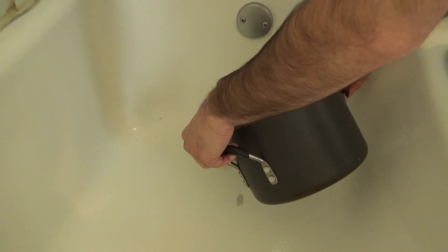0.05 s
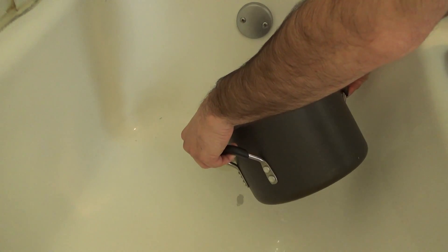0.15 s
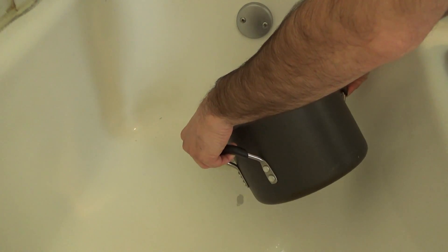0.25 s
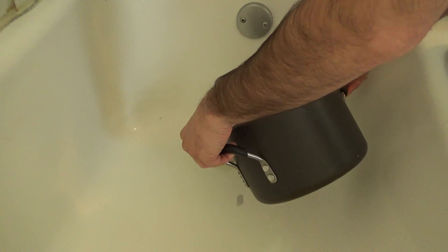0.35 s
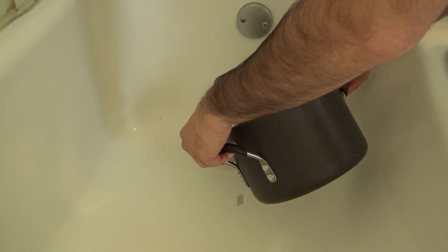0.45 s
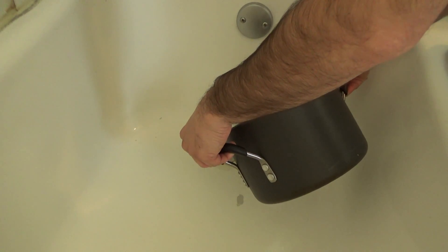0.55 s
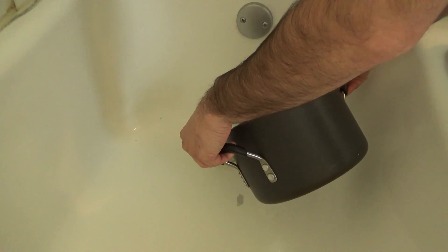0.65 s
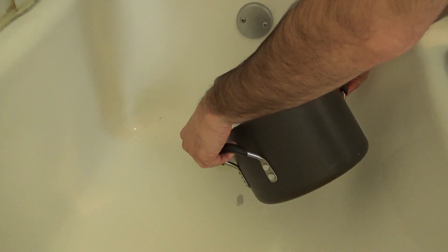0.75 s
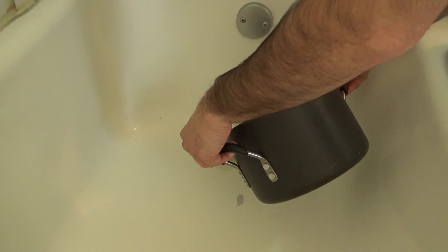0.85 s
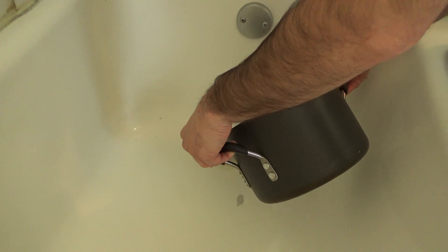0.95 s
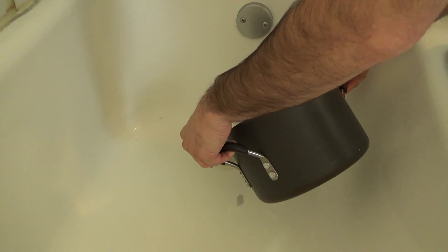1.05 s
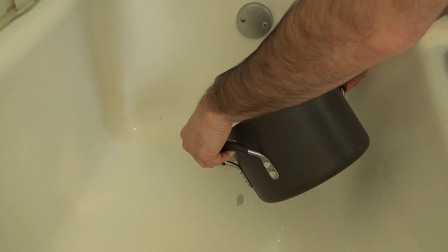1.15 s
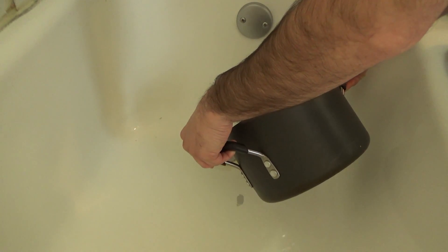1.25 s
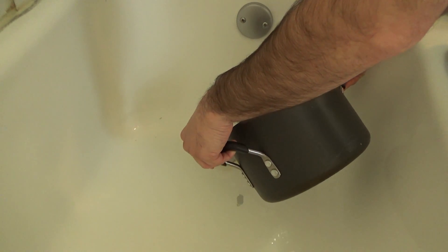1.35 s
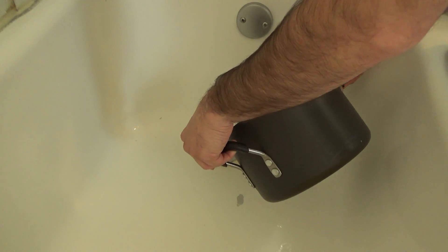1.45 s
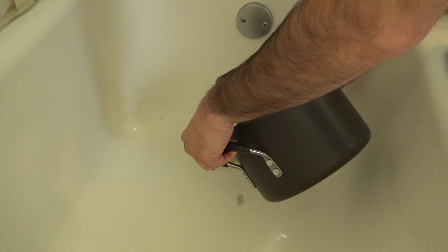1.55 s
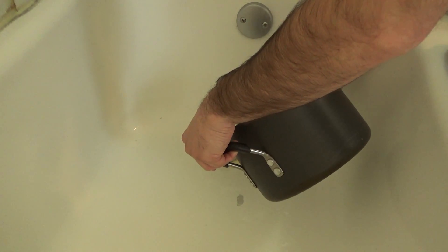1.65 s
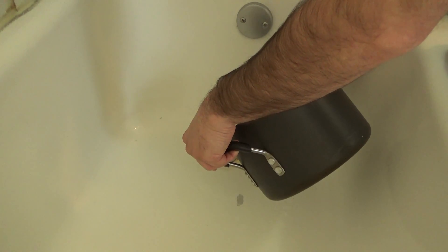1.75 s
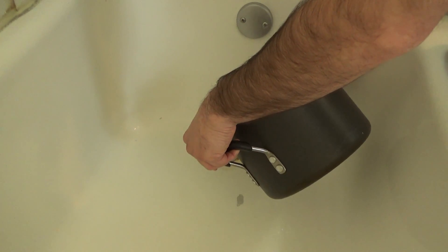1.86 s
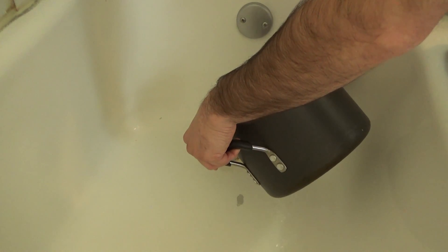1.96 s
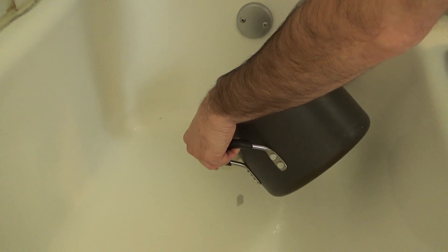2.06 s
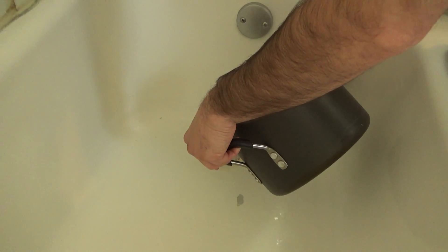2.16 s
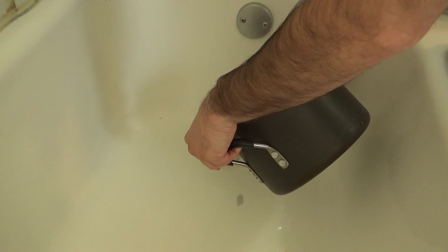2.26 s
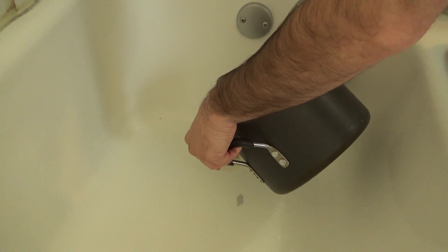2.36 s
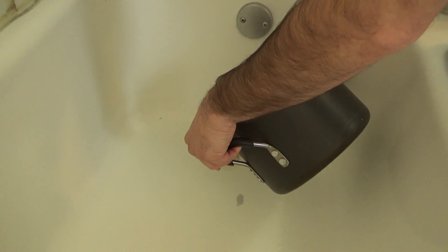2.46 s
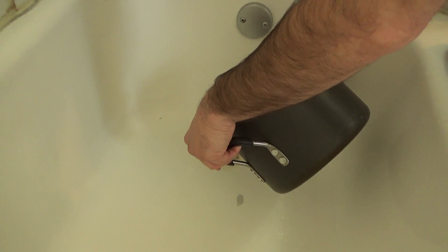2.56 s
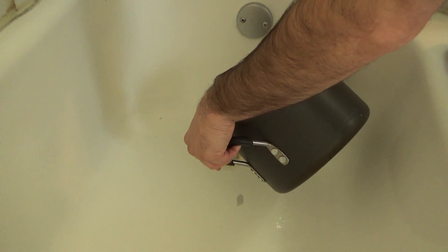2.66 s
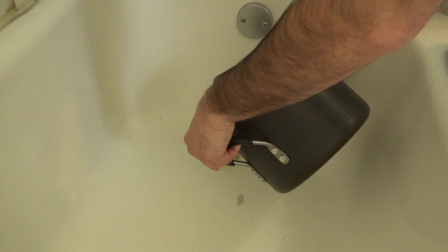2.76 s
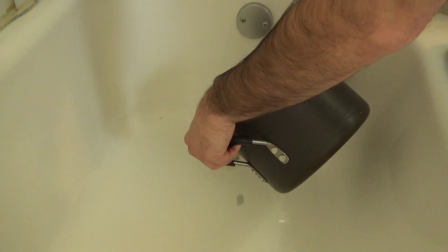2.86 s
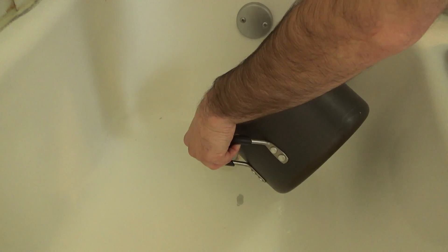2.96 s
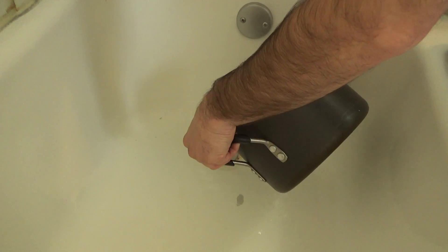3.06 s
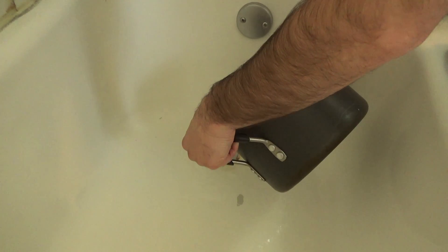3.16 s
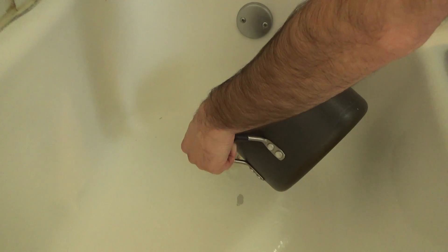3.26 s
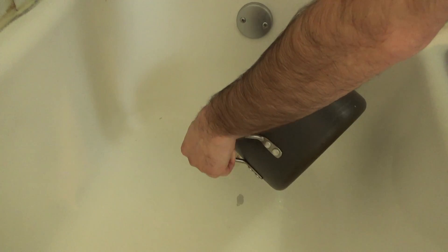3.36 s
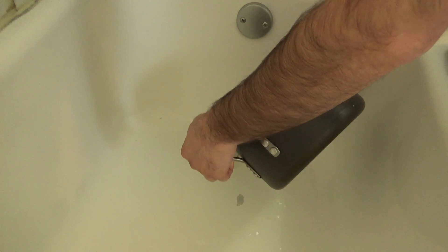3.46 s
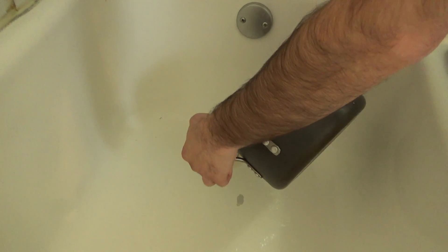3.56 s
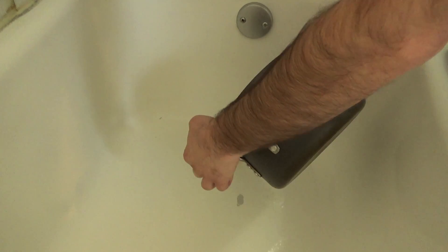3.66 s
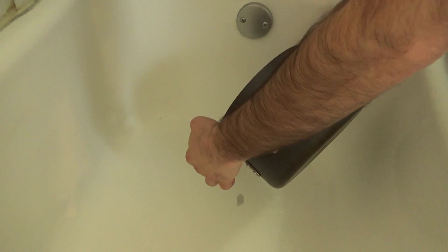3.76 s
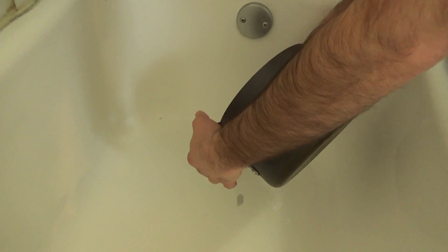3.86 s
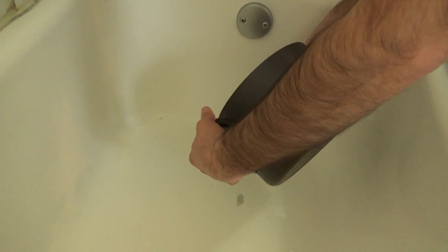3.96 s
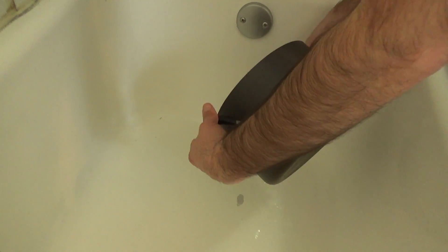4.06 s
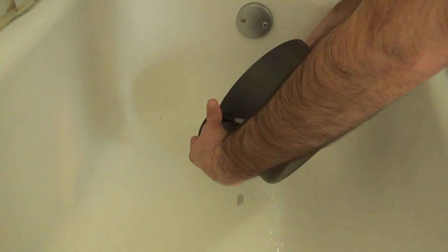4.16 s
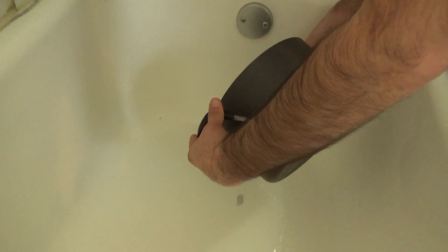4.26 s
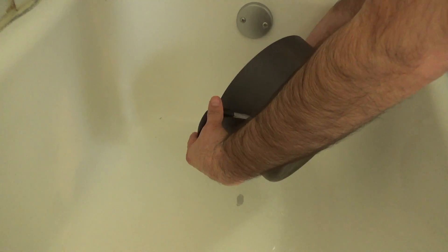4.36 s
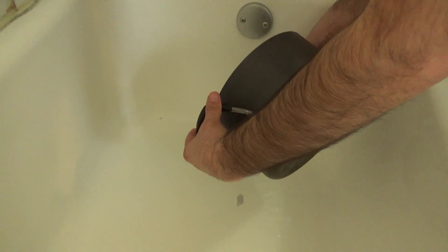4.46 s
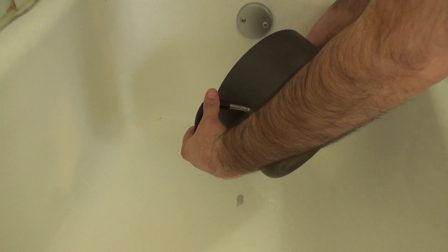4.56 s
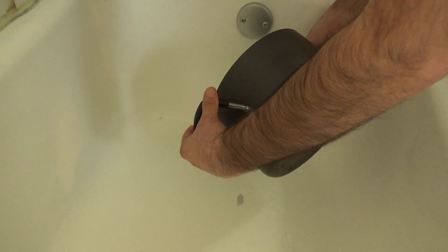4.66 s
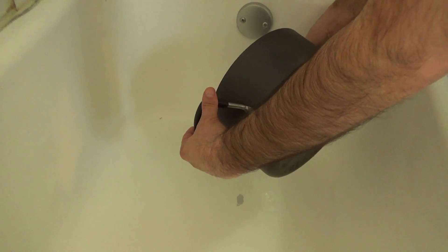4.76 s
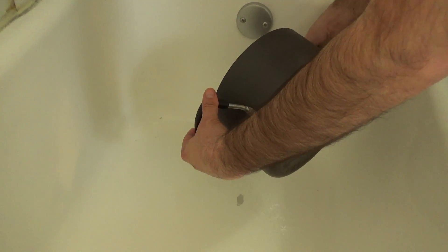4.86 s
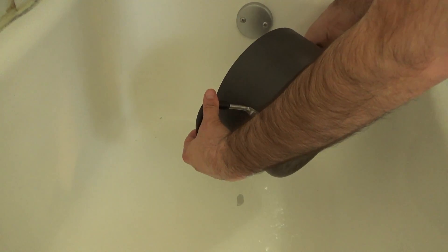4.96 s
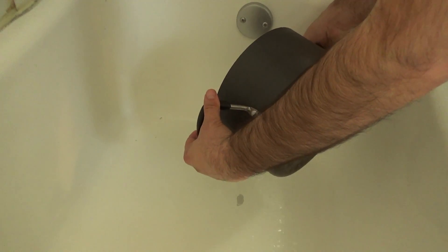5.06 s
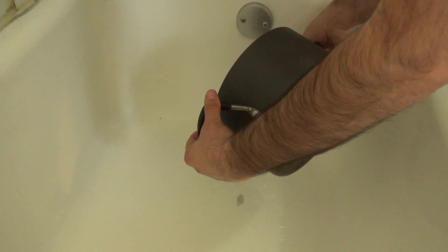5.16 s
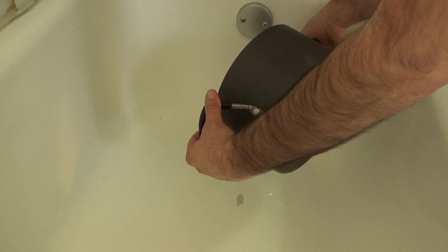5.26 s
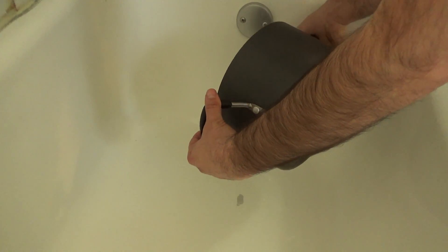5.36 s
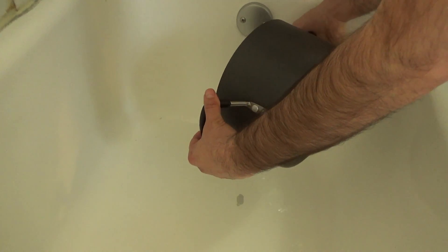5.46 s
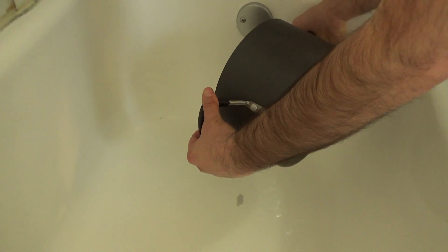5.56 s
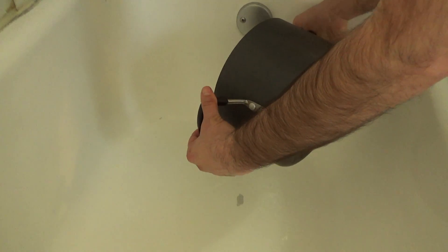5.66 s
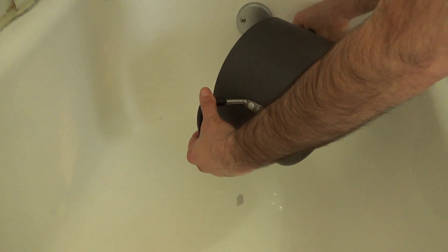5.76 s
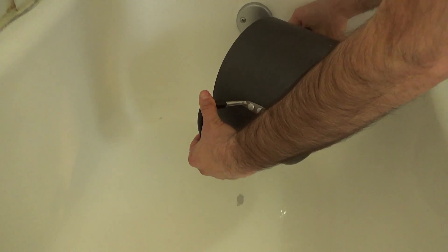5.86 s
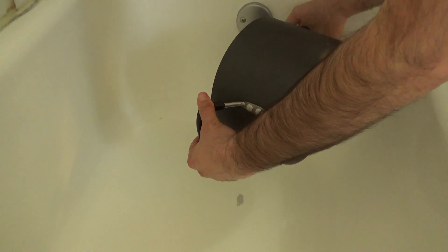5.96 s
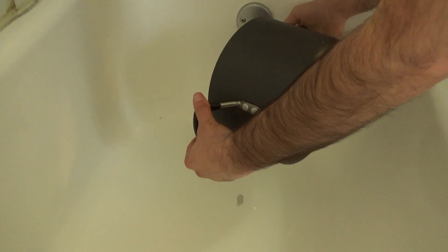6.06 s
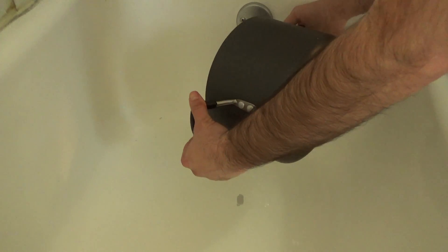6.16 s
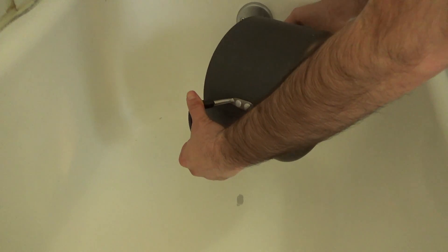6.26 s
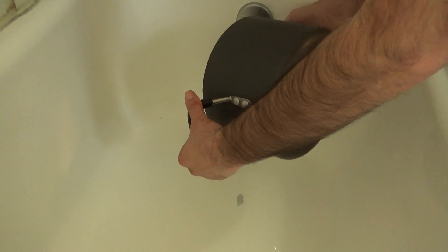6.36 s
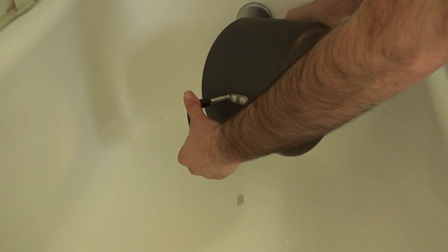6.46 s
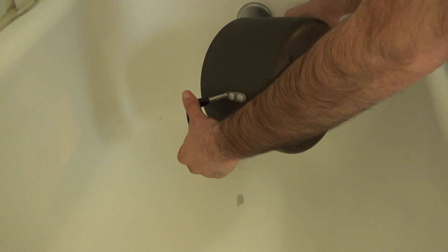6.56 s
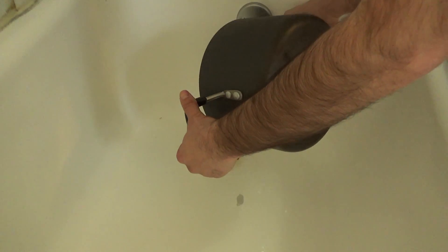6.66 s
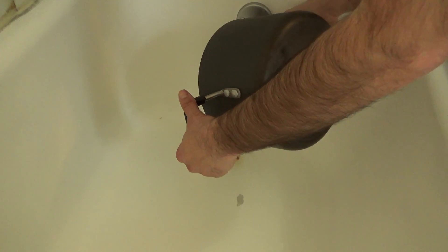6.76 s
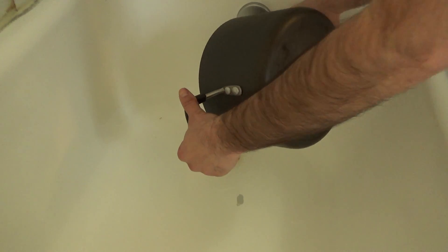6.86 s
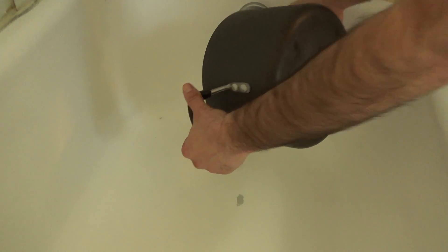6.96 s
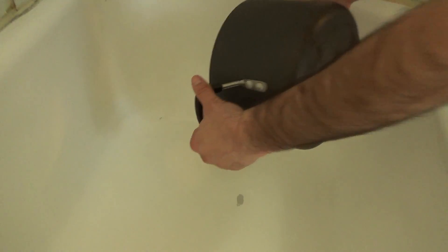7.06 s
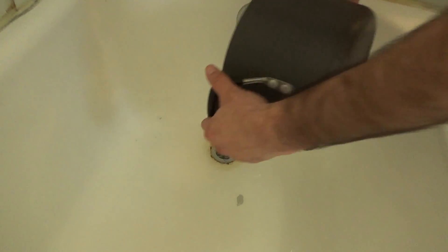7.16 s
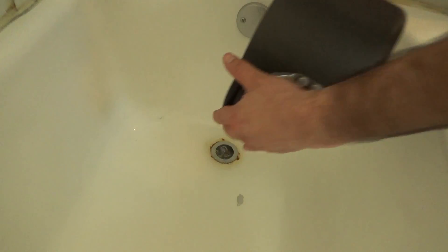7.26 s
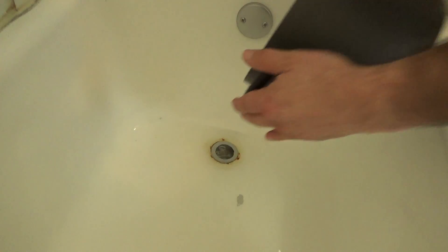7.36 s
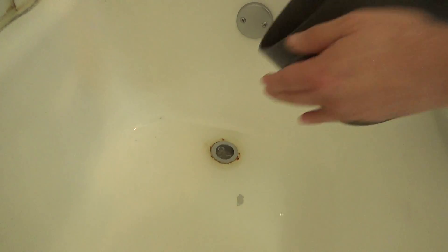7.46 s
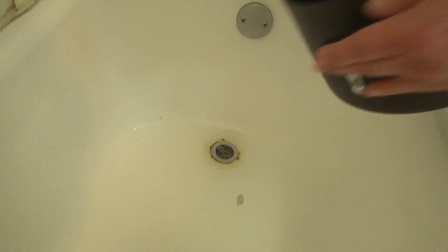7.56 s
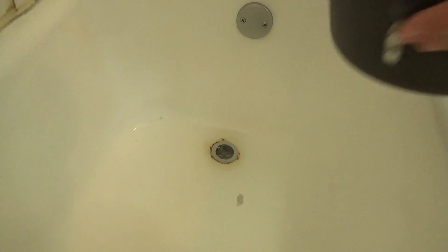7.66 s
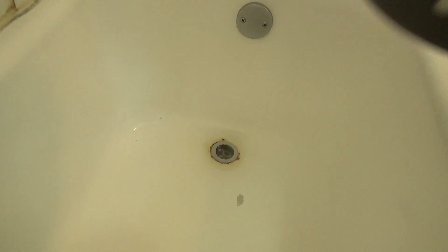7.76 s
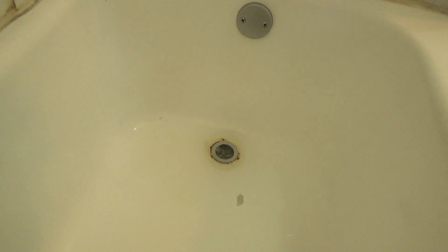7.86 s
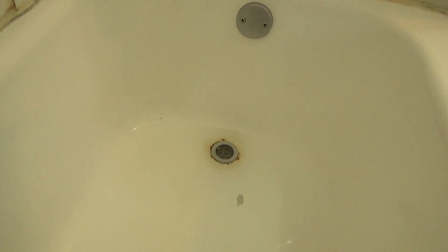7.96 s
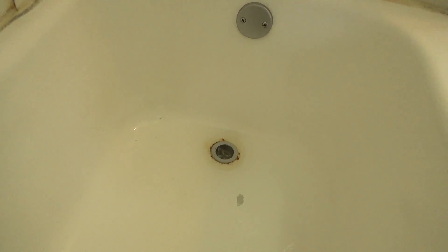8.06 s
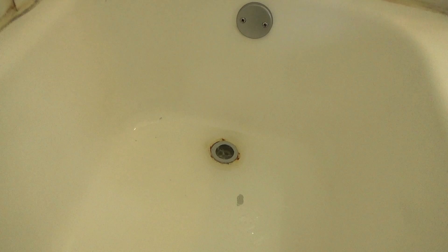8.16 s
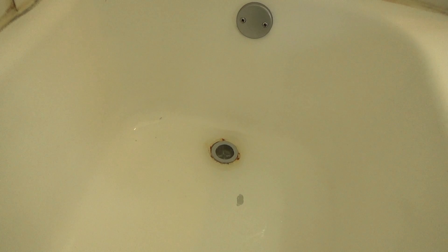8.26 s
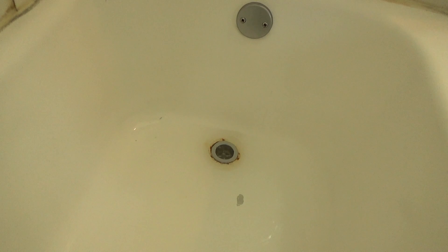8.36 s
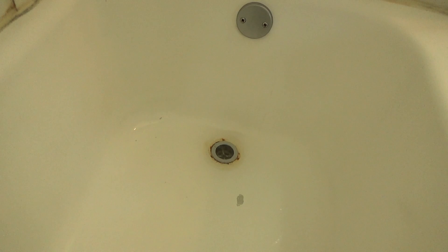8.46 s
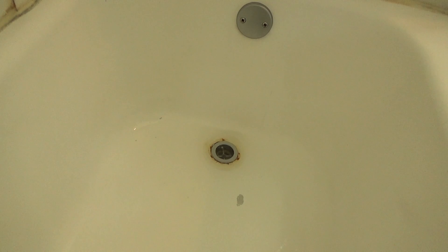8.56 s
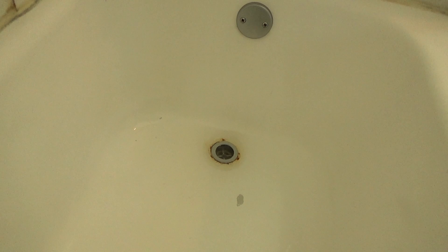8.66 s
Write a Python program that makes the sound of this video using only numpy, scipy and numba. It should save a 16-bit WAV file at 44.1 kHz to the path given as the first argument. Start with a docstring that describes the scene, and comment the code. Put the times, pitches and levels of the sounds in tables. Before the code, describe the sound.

A stereo microphone above the bathtub catches an already running pour: dense tiny bubbles, sharp wet slaps, fine spray and muffled tub resonance, strongest in the first few seconds. It thins to separate plips and gulps, then bright drips around the pot's removal. Soft dull bumps follow, with a smooth hiss swelling and fading slightly to the right, in a short tiled echo.

```python
"""Hot water into a bathtub

Hot water is tipped from a pot onto the floor of an enamelled tub in a small tiled room. The stream is thousands
of tiny sine bubbles; its slaps add ticks, trapped air, crackle and noise spray, and ring the tub's decaying modes.
Single bubbles sound from low gulps to high blips, and the last drips tick. Then a soft hiss of filtered noise
swells among a few dull modal knocks, over the quiet of the room: shaped noise with a low rumble."""
import sys
import numpy as np
from scipy import signal
from scipy.fft import rfft, irfft
from scipy.io import wavfile
from scipy.ndimage import uniform_filter1d
from numba import njit

SR = 44100
rng = np.random.default_rng(int(sys.argv[2]) if len(sys.argv) > 2 else 0)


def to_wav(sig):
    """Store sig (one row per channel, or 1-D mono) as 16-bit WAV at the path in sys.argv[1].

    Samples outside -1..1 are clipped; the rate is SR.
    """
    pcm = np.clip(np.atleast_2d(sig), -1, 1) * 32767
    pcm = np.round(pcm).astype(np.int16)
    wavfile.write(sys.argv[1], SR, pcm.T)  # frames by channels


N = 384552
TIME = np.arange(N) / SR

# All source levels are relative: layer gains, the room and the microphone come after them.
# Tone of the quiet room. Each row: frequency in Hz, relative density in dB.
QUIET_TONE = [(12, -44), (20, -15), (79, -1), (216, -6), (270, 3.5), (660, 0), (2990, -4.5), (3250, -3.5),
              (6540, -10), (12100, -15), (16000, -56)]
# Left-right likeness of the quiet room. Each row: frequency in Hz, correlation from 0 to 1.
QUIET_LIKENESS = [(25, .7), (60, 0.97), (500, 0.8), (2000, 0.073), (8000, 0.73)]
QUIET_DB = -63.5  # rms of the quiet without its rumble
# The low rumble. Each row: time in seconds, level in dB.
RUMBLE = [(0, -87), (4.7, -84), (5.0, -66), (5.3, -90), (6.4, -63), (7.0, -101), (7.9, -67), (8.25, -64),
          (8.72, -88)]

# The stream between slaps. Each row: time in seconds, wash level in dB, level of the drumming on the tub in dB.
FLOW = [(0.0, -44, -36.5), (0.23, -47, -49), (0.62, -40, -41.5), (0.88, -43, -47), (1.15, -41, -35.5),
        (1.36, -40, -52), (1.54, -42, -57), (2.13, -46, -47), (2.57, -44.5, -54), (2.75, -46.5, -67),
        (2.94, -46, -51), (3.14, -45.5, -74), (3.43, -47.5, -51.5), (3.84, -51.5, -61), (4.11, -48.5, -45),
        (4.23, -48.5, -45.5), (4.87, -51.5, -47.5), (5.24, -51.5, -50), (6.28, -50.5, -57),
        (6.4, -54.5, -48.5), (6.55, -63, -62.5), (7.0, -75.5, -77)]
# Moments when the stream thins. Each row: centre in seconds, width (standard deviation) in seconds.
LULLS = [(1.2, 0.1), (3.28, 0.034), (3.87, 0.0076), (4.36, 0.024), (5.12, 0.02)]
LULL_DB = -8  # wash and drumming at the centre of a lull
FULL_FLOW_DB = -42  # wash level taken as full flow
SPRAY_SHARE_DB = -4  # spray against the wash, at full flow
SPRAY_FOLLOWS = 0.64  # dB that the spray moves per dB of wash

# Modes of the tub shell. Each row: frequency in Hz, drive level in dB, decay by 60 dB in seconds.
TUB_MODES = [(127.7, 4.5, 0.2), (185, -2.5, 0.3), (248.2, -5, 0.17), (286.7, -4, 0.31), (343.2, -1, 0.22),
             (401.7, -1.5, 0.08), (510.6, -3.5, 0.095), (658, 8.5, 0.043), (730, 4.5, 0.076),
             (780.4, 0, 0.079), (850, 7.5, 0.039), (977, 2.5, 0.043), (1360, 6.5, 0.034), (1510, 3, 0.063),
             (1814, 4, 0.06)]
# The stream wanders over the tub floor, so each mode swells and fades (scale in dB, steps per s).
WANDER_DB, WANDER_RATE = 3.5, 20
# Sloshing water loads the shell and bends its pitch (scale of the time slip in s, steps per s).
LOAD_S, LOAD_RATE = 0.0008, 12

# Slaps placed one by one, loud and faint.
# Each row: time in seconds, level in dB, pitch of the trapped air in Hz, spray level in dB.
PLACED_SLAPS = [(0.027, -28, 5160, -27.5), (0.082, -23.5, 1850, -23), (0.119, -28, 4700, -41),
                (0.201, -19, 3500, -26.5), (0.219, -20, 4200, -33), (0.239, -26, 4330, -35),
                (0.325, -27, 2970, -47), (0.344, -20.5, 3450, -28.5), (0.461, -15, 3180, -30),
                (0.516, -24, 2800, -33), (0.621, -22, 5340, -24), (0.69, -16.5, 3480, -21),
                (0.784, -28, 5550, -28), (0.82, -21.5, 3500, -47), (0.872, -26, 3450, -26),
                (0.933, -20, 3415, -26), (1.025, -22.5, 3500, -40), (1.077, -26.5, 5560, -28),
                (1.111, -22.5, 3260, -43), (1.118, -15.5, 1750, -20), (1.262, -19, 1730, -27.5),
                (1.329, -43, 1658, -38), (1.399, -16.5, 1630, -25), (1.493, -21.5, 3680, -46),
                (1.526, -20, 1480, -51), (1.55, -19, 1770, -48), (1.62, -12, 2100, -42),
                (1.672, -18.5, 3270, -54), (1.689, -21, 3180, -47), (1.698, -24, 3100, -29),
                (1.744, -31, 5520, -21.5), (1.775, -22, 3580, -28), (1.812, -37, 5470, -17.5),
                (1.95, -20.5, 5380, -27), (2.013, -21, 5050, -24.5), (2.042, -21.5, 3670, -23),
                (2.108, -17, 5400, -37), (2.127, -19.5, 4100, -30), (2.151, -19.5, 1840, -36),
                (2.22, -23, 5140, -28), (2.303, -23, 5200, -23), (2.339, -16.5, 3590, -24),
                (2.389, -18.5, 3060, -26), (2.581, -22.5, 4800, -33), (2.592, -23, 5000, -40),
                (2.688, -22, 2200, -50), (2.702, -25, 4900, -34), (2.722, -28, 4600, -31),
                (2.825, -34, 5300, -43), (2.853, -33, 3600, -56), (2.922, -23.5, 3500, -53),
                (2.993, -23.5, 3100, -45), (3.022, -19, 3450, -31), (3.095, -26, 4870, -51),
                (3.132, -26.5, 4940, -34), (3.165, -31, 4800, -45), (3.208, -51, 1390, -31),
                (3.258, -32, 5250, -32), (3.309, -25.5, 4750, -32), (3.594, -32, 1470, -26.5),
                (3.677, -25.5, 1560, -26), (3.74, -33, 3500, -34), (3.781, -29, 3450, -22.5),
                (3.943, -29, 5200, -28.5), (4.001, -25, 5000, -29), (4.03, -29.5, 4300, -31),
                (4.054, -25.5, 1330, -28), (4.18, -28.5, 5200, -54), (4.432, -22.5, 1560, -56),
                (4.542, -16.5, 5770, -25), (4.622, -24.5, 5500, -28), (4.694, -26.5, 5800, -47),
                (4.898, -28, 4800, -27), (4.987, -22.5, 2100, -28), (5.01, -22, 5500, -31),
                (5.247, -32, 1820, -33.5), (5.341, -21.5, 5570, -27), (5.68, -17, 5500, -21),
                (5.794, -31, 1850, -56), (5.89, -29, 1500, -29), (5.955, -26, 5360, -35),
                (5.966, -25.5, 2630, -27), (6.009, -41, 1780, -51), (6.048, -24.5, 1770, -57),
                (6.078, -24, 1440, -31), (6.102, -27, 4450, -46), (6.136, -48, 4270, -26),
                (6.194, -29, 1510, -56), (6.313, -27, 4150, -49), (6.326, -24.5, 1520, -21.5),
                (6.374, -24, 1350, -51)]
# Surges of froth. Each row: start in seconds, level in dB, middle pitch in Hz.
SURGES = [(0.198, -39.5, 3500), (0.681, -37, 3400), (1.6, -32, 2500), (2.359, -29.5, 2950),
          (3.724, -30, 3310)]
# Single bubbles, from low gulps to high blips.
# Each row: start in seconds, level in dB, starting pitch in Hz, decay length in cycles.
SINGLE_BUBBLES = [(.514, -18.5, 685, 4.4), (.535, -16.5, 716, 2), (1.61, -22, 1680, 5),
                  (1.621, -20.5, 2950, 5.8), (1.635, -28, 3020, 7.1), (1.696, -21.5, 3000, 5),
                  (3.828, -23, 786, 1.8), (4.066, -32, 1470, 3.2), (4.074, -20.5, 1360, 2.6),
                  (4.09, -23, 1500, 2.6), (6.011, -23, 1740, 2.6), (6.0476, -23, 1340, 2.4),
                  (6.2036, -25, 1220, 3.7), (6.229, -28, 1050, 5.4), (6.527, -40, 1144, 32),
                  (.64, -15, 740, 2.3), (2.08, -40, 104, 2.8), (2.6, -26.5, 1310, 6.8),
                  (2.919, -43.5, 249, 5.8), (2.76, -20, 705, 2), (1.421, -27, 1530, 3.8),
                  (1.547, -17.5, 1760, 6.5), (4.806, -27.5, 1780, 3.8), (4.909, -27, 730, 3),
                  (5.259, -27, 1010, 3.2), (5.291, -28, 705, 3), (5.545, -27.5, 750, 2.8),
                  (5.49, -28, 1480, 7.5), (2.99, -26.5, 714, 5), (3.221, -22, 1450, 4.6),
                  (6.196, -24, 835, 2.7), (6.221, -40, 255, 3.2), (6.255, -32, 251, 2),
                  (6.289, -36, 250, 2), (6.32, -40, 255, 2.5), (6.325, -24, 780, 4.9),
                  (6.375, -17.5, 765, 2.7), (6.392, -24, 750, 2.7), (6.52, -22, 1090, 3.9)]
# The last drips from the rim. Each row: time in seconds, level in dB, pitch in Hz, spray level in dB.
DRIPS = [(6.4027, -31, 5130, -44), (6.419, -21, 4680, -29.5), (6.468, -25, 4050, -33.5),
         (6.4937, -28.5, 4170, -36), (6.554, -33, 5550, -39), (6.573, -40, 3600, -42),
         (6.745, -26, 5700, -40.5), (6.803, -44, 4620, -50), (6.818, -43, 5400, -45),
         (6.862, -43, 5430, -61), (6.9304, -45, 5760, -62), (6.9633, -47, 5180, -55),
         (7.088, -50, 5800, -57)]
DRIP_ROOM = 0.66  # share of the drips that reaches the walls

# Dull knocks. Each row: time in seconds, level in dB, crack against it in dB, thud against it in dB.
KNOCKS = [(6.645, -46, -27, 2.5), (6.736, -51.5, -18, -2), (6.783, -51, -27, 1), (6.838, -58, -19, 9),
          (7.502, -55, -7, -9), (7.647, -43.5, -9, -22), (8.242, -36.5, -38, -17), (8.335, -50.5, -15, -23),
          (8.612, -49, -10, -29)]
# Modes of what is knocked. Each row: frequency in Hz, relative level in dB, decay by 60 dB in seconds.
KNOCKED_MODES = [(318, -20, 0.13), (362, -6, 0.087), (470, -9.5, 0.14), (550, -3.5, 0.051), (654, -7, 0.16),
                 (840, 0, 0.042), (1046, 1, 0.019)]
# The soft hiss after the pour. Each row: time in seconds, level of the low part in dB, level of the treble in dB.
HISS = [(7.0, -80, -69), (7.25, -64.5, -65), (7.45, -58.5, -62.5), (7.7, -49.5, -54), (7.85, -53, -56),
        (8.1, -51, -53.5), (8.3, -58, -59), (8.47, -62, -68), (8.63, -54.5, -56.5), (8.72, -54.5, -67)]
# Swishes in the hiss. Each row: centre in seconds, level in dB, width (standard deviation) in seconds.
SWISHES = [(7.29, -64, 0.084), (7.62, -58.5, 0.093), (7.91, -56, 0.017), (8.63, -63.5, 0.044)]

ROOM_T60_S, ROOM_DB = 0.26, -4.5  # decay of the tail's duller part, level of the tail
# Colour of the microphone above the tub. Each row: frequency in Hz, gain in dB.
MICROPHONE = [(100, -18.5), (250, -7), (1100, -11), (1800, -5), (2400, -5), (3500, 0), (5500, 1.5),
              (6000, -5), (6500, -11.5), (7000, -9), (11400, 1), (14000, -11.5), (15200, -25), (16000, -33)]
TOP_HZ = 16200


def undb(db):
    """Gain of a dB value."""
    return 10 ** (np.asarray(db) / 20)


def unit(x):
    """Scaled to rms 1."""
    return x / np.sqrt(np.mean(x ** 2))


def read(points, hz):
    """A spectrum table read on a log-frequency axis."""
    f, value = np.transpose(points)
    return np.interp(np.log(np.maximum(hz, 1)), np.log(f), value)


def curve(table):
    """Each dB column as gain over time, silent outside the table."""
    s, *levels = np.transpose(table)
    inside = (TIME >= s[0]) * (TIME <= s[-1])
    return [undb(np.interp(TIME, s, db)) * inside for db in levels]


def band(x, lo_hz, hi_hz):
    """Band-pass."""
    sos = signal.butter(2, [lo_hz, min(hi_hz, .45 * SR)], "band", fs=SR, output="sos")
    return signal.sosfilt(sos, x)


def walk(rate):
    """Random levels held for 1 / rate s, then smoothed twice into a slow wander."""
    hold = int(SR / rate)
    steps = np.repeat(rng.standard_normal(N // hold + 1), hold)
    return uniform_filter1d(uniform_filter1d(steps, hold), hold)[:N]


def bump(s, width):
    """A bell-shaped rise and fall around a time."""
    return np.exp(-.5 * ((TIME - s) / width) ** 2)


def spikes(s, size):
    """One sample at each time."""
    return np.bincount(np.clip(s * SR, 0, N - 1).astype(int), size, N)


def fade(x, t60):
    """Every spike becomes a dying envelope."""
    return signal.lfilter([1], [1, -1000 ** (-1 / (t60 * SR))], x)


def swell(s, db, rise_t60, t60):
    """An envelope at each time that rises quickly and dies: a slow decay minus a fast one."""
    burst = spikes(s, undb(db))
    return fade(burst, t60) - fade(burst, rise_t60)


@njit
def grains(n, start, step, cycles, rise, left, right):
    """Bubbles: sines that swell for a cycle and die, their pitch climbing by rise as they near the surface."""
    out = np.zeros((2, n))
    for g in range(len(start)):
        life = cycles[g] / step[g]  # samples to fall to 1/e
        phase = 0.  # in cycles
        for i in range(min(int(5 * life), n - start[g])):
            phase += step[g] * (1 + rise * i / life)
            v = np.sin(2 * np.pi * phase) * np.exp(-i / life) * min(phase, 1.)
            out[0, start[g] + i] += left[g] * v
            out[1, start[g] + i] += right[g] * v
    return out


def bubbles(s, hz, cycles, rise, size, pan_db):
    """Grains placed left and right by a level difference."""
    start = np.clip(s * SR, 0, N - 1).astype(np.int64)
    step = np.clip(hz, 50, .4 * SR) / SR
    return grains(N, start, step, cycles + 0 * s, rise, size * undb(pan_db / 2), size * undb(-pan_db / 2))


def patter(count, lo_hz, hi_hz, cycles, spread_db, clump_db, clump_rate, pan_db):
    """Dense random bubbles of uneven size that arrive in clumps; rms 1."""
    when, pitch, last = rng.random((count, 3)).T
    big = np.minimum(rng.exponential(size=count), 4)
    clump = undb(clump_db * walk(clump_rate))[(when * N).astype(int)]
    hz = lo_hz * (hi_hz / lo_hz) ** pitch
    size = clump * undb(spread_db * big)
    pan = pan_db * rng.standard_normal(count)
    return unit(bubbles(when * N / SR, hz, cycles * (.5 + last), 0.065, size, pan))


def swarm(s, db, hz, count, spread_s, detune, cycles, rise):
    """A few like-sized bubbles after each time, the later ones smaller and more scattered."""
    late, tune, big, pan = rng.standard_normal((len(s), 4, count)).transpose(1, 0, 2)
    order = np.arange(count) / count
    late = np.abs(late) * order
    start = s[:, None] + spread_s * late
    pitch = hz[:, None] * np.exp(detune * tune * order)
    size = undb(db[:, None] + 3.4 * big * order) * np.exp(-1.2 * late)
    return bubbles(start.ravel(), pitch.ravel(), cycles, rise, size.ravel(), 2.7 * pan.ravel())


def quiet():
    """The steady background: shaped noise, partly alike left and right, with a low rumble that wavers."""
    hz = np.fft.rfftfreq(N, 1 / SR)
    alike = np.clip(read(QUIET_LIKENESS, hz), 0, 1)
    mid, side = rfft(rng.standard_normal((2, N))) * undb(read(QUIET_TONE, hz))
    hush = irfft(np.sqrt(1 + alike) * mid + np.sqrt(1 - alike) * side * [[1], [-1]], N)
    rumble = undb(-12) * curve(RUMBLE)[0] * unit(band(rng.standard_normal(N), 62.0, 77.0))
    return undb(QUIET_DB) * unit(hush) + rumble


def flow():
    """Levels over time of wash, drumming and spray (dB); the spray follows the wash less than fully."""
    s, *levels = np.transpose(FLOW)
    lull_db = LULL_DB * sum(bump(*lull) for lull in LULLS)
    wash_db, drum_db = (np.interp(TIME, s, db, right=-140) + lull_db for db in levels)
    spray_db = FULL_FLOW_DB + SPRAY_SHARE_DB + SPRAY_FOLLOWS * (wash_db - FULL_FLOW_DB)
    return wash_db, drum_db, spray_db


def tub(x):
    """The shell: each mode is driven more or less as the landing spot moves, and all waver in pitch."""
    out = 0
    for k, (hz, db, t60) in enumerate(TUB_MODES):
        r, w = 1000 ** (-1 / (t60 * SR)), 2 * np.pi * hz / SR
        drive = x * undb(db + WANDER_DB * walk(WANDER_RATE))
        mode = signal.lfilter([0, r * np.sin(w)], [1, -2 * r * np.cos(w), r * r], drive)
        out = out + (-1) ** k * mode  # neighbours have opposite signs
    return np.interp(TIME + LOAD_S * walk(LOAD_RATE), TIME, out)


def stream():
    """Fizz, plinking bubbles, spray and drumming on the shell, following the flow."""
    wash, drum, spray_gain = undb(flow())
    fizz = patter(count=22000, lo_hz=949, hi_hz=6480, cycles=2.0,
                  spread_db=5.5, clump_db=6.0, clump_rate=70, pan_db=2.0)
    plinks = patter(count=1500, lo_hz=598, hi_hz=3500, cycles=2.63,
                    spread_db=-0.5, clump_db=3.5, clump_rate=15, pan_db=3.5)
    mist = patter(count=50000, lo_hz=6000, hi_hz=17800, cycles=2.5,
                  spread_db=7.5, clump_db=4.5, clump_rate=43, pan_db=5.0)
    blows = patter(count=4000, lo_hz=392, hi_hz=2850, cycles=1.0,
                   spread_db=3.0, clump_db=2.0, clump_rate=18, pan_db=-3.5)
    shell = unit(tub(blows[0]))
    return wash * (undb(-1.0) * fizz + undb(-2.0) * plinks) + spray_gain * mist + drum * shell


def random_slaps(count):
    """Drops that break off the stream at random, sized by the flow: rows as in PLACED_SLAPS."""
    when, pitch, big, fine = rng.random((count, 4)).T
    at = (when * FLOW[-1][0] * SR).astype(int)
    wash_db, _, spray_db = flow()
    size_db = 9.3 + 7.0 * big ** 2
    hz = 1200 * 4.5 ** pitch
    return np.transpose([at / SR, wash_db[at] + size_db, hz, spray_db[at] + size_db - 4.5 - 1.6 * fine])


def spray(s, db):
    """Bursts of fine droplets: noise in two treble bands that flicker together and a little on their own."""
    noise = rng.standard_normal(N) + 0.34 * rng.standard_normal((2, N))
    together_db = 3.5 * walk(400)
    fine, finest = (undb(together_db + 1.5 * walk(90)) * band(noise, lo, hi)
                    for lo, hi in [(6700, 11330), (10200, 17000)])
    return swell(s, db, 0.0051, 0.016) * unit(fine + finest)


def slaps():
    """Each slap: a tick, a swarm of bubbles, a burst of crackle, spray, and a blow on the shell."""
    s, db, hz, spray_db = np.vstack([PLACED_SLAPS, random_slaps(count=850)]).T
    grit = patter(count=30000, lo_hz=670, hi_hz=6260, cycles=1.2,
                  spread_db=3.0, clump_db=4.0, clump_rate=150, pan_db=4.5)
    crackle = swell(s, db, 0.0027, 0.028) * grit
    # a water film cushions the shell: its ring grows by only 0.59 dB per dB of slap
    push_db = 0.59 * db + 2.7 * rng.standard_normal(len(s))
    push = band(spikes(s, undb(push_db)), 408, 1780)
    tick = swarm(s, db, 1.46 * hz, count=1, spread_s=0, detune=0, cycles=0.66, rise=0.)
    air = swarm(s, db, hz, count=5, spread_s=.008, detune=0.26, cycles=4.87, rise=0.0086)
    return (undb(-8.5) * air + undb(-11.0) * crackle + undb(5.0) * spray(s, spray_db)
            + undb(4.0) * tick + undb(-34.5) * tub(push))


def surges():
    """Dense runs of small bubbles of mixed size that build up and thin out."""
    s, db, hz = np.transpose(SURGES)[:, :, None]
    late, tune, big, pan = rng.standard_normal((len(SURGES), 4, 100)).transpose(1, 0, 2)
    start = s + .055 + .04 * late  # thickest 55 ms after the listed time
    pitch = hz * np.exp(0.38 * tune)
    size = undb(db - 4 + 3.5 * big)
    return bubbles(start.ravel(), pitch.ravel(), 2.9, 0.023, size.ravel(), 2.3 * pan.ravel())


def single_bubbles():
    """Low gulps to high blips, each a sine that dies over its own number of cycles as its pitch climbs slightly."""
    s, db, hz, cycles = np.transpose(SINGLE_BUBBLES)
    return bubbles(s, hz, cycles, 0.014, undb(db), 0 * s)


def drips():
    """Short bright ticks, each with a few bubbles of trapped air and a little spray."""
    s, db, hz, spray_db = np.transpose(DRIPS)
    tick = swarm(s, db, hz, count=1, spread_s=0, detune=0, cycles=0.51, rise=0.)
    air = swarm(s, db, hz, count=4, spread_s=0.006, detune=0.078, cycles=3.2, rise=0.027)
    return undb(1) * tick + undb(-3.5) * air + undb(9.0) * spray(s, spray_db)


def ring(x, modes):
    """Sum of decaying modes, scaled to peak 1 per unit blow; neighbours have opposite signs."""
    t = TIME[:SR // 2]
    taps = sum((-1) ** k * undb(db) * np.sin(2 * np.pi * hz * t) * 1000 ** (-t / t60)
               for k, (hz, db, t60) in enumerate(modes))
    return signal.fftconvolve(x, taps / np.abs(taps).max())[:N]


def knocks():
    """A blow into low modes with a short crack, a thud and a rough tail."""
    s, db, bright_db, thud_db = np.transpose(KNOCKS)
    blow = spikes(s, undb(db))
    crack = fade(spikes(s, undb(db + bright_db)), 0.11) * unit(band(rng.standard_normal(N), 950, 3200))
    tail = fade(blow, 0.21) * unit(band(rng.standard_normal(N), 340, 830))
    thud = bubbles(s, 260 + 0 * s, 1.8, 0., undb(db + thud_db), 0 * s)
    return undb(6.0) * ring(blow, KNOCKED_MODES) + undb(8.0) * crack + undb(-1.0) * tail + undb(8.5) * thud


def hiss():
    """Smooth low and high noise that swells, with short swishes between; slightly to the right."""
    noise = rng.standard_normal(N) + 0.41 * rng.standard_normal((2, N))
    body, sheen, under, air = (unit(band(noise, lo, hi)) for lo, hi in
                               [(1830, 3900), (6700, 9800), (315, 2050), (8670, 13500)])
    swish = sum(undb(db) * bump(s, width) for s, db, width in SWISHES)
    low, high = curve(HISS)
    bed = low * under + high * (air + undb(-4.5) * sheen)
    return (swish * (body + sheen) + bed) * undb([[-.4], [.4]])


def room(x):
    """Tiled walls: a decaying noise tail that differs between the ears, most of all from 2640 to 8000 Hz."""
    t = TIME[:int(.6 * SR)]
    noise = rng.standard_normal(len(t)) + 0.79 * band(rng.standard_normal((2, len(t))), 2640, 8000)
    noise = noise + 0.22 * rng.standard_normal((2, len(t)))
    dull = band(noise, 67, 4600)
    rest = noise - dull  # dies slightly slower
    tail = dull * 1000 ** (-t / ROOM_T60_S) + rest * 1000 ** (-t / (1.1 * ROOM_T60_S))
    tail *= t > .003  # nothing comes back in the first 3 ms
    tail /= np.sqrt(np.sum(tail ** 2) / 2)
    return x + undb(ROOM_DB) * signal.fftconvolve(x.mean(axis=0)[None], tail, axes=1)[:, :N]


def colour(x, points):
    """Causal filter with the given gain curve: minimum phase, by folding the cepstrum."""
    size = 4096
    cep = irfft(np.log(undb(read(points, np.fft.rfftfreq(size, 1 / SR)))))
    cep[1:size // 2] *= 2
    cep[size // 2 + 1:] = 0
    taps = irfft(np.exp(rfft(cep)))
    return signal.fftconvolve(np.atleast_2d(x), taps[None], axes=1)[:, :N]


def scene():
    """Everything in the room as the microphone colours it, over the quiet."""
    drops = drips()
    wet = room(stream() + slaps() + surges() + single_bubbles() + DRIP_ROOM * drops + knocks() + hiss())
    return colour(wet + (1 - DRIP_ROOM) * drops, MICROPHONE) + quiet()


def record(dry):
    """A steep elliptic low-pass leaves nothing above about 16 kHz."""
    return signal.sosfilt(signal.ellip(8, .2, 70, TOP_HZ, fs=SR, output="sos"), dry)


dry = scene()
out = record(dry)
to_wav(out)
```